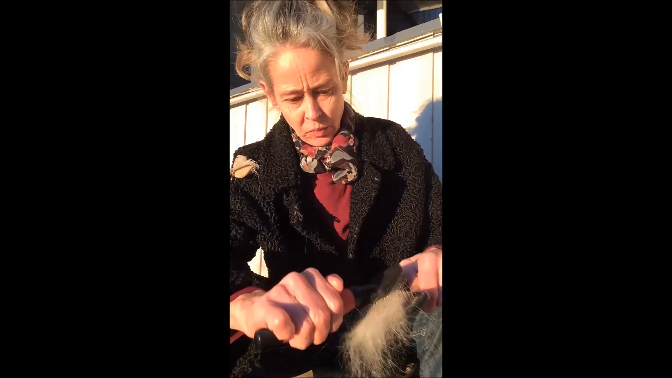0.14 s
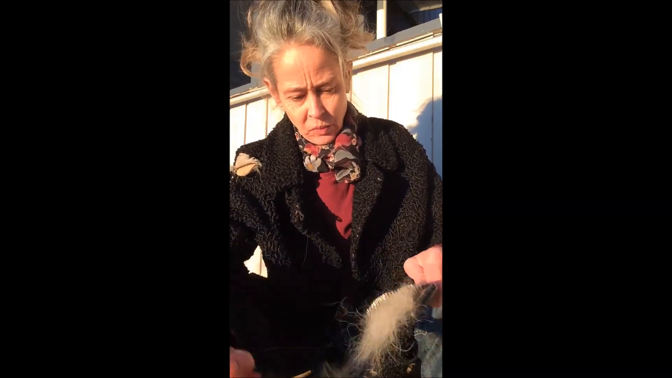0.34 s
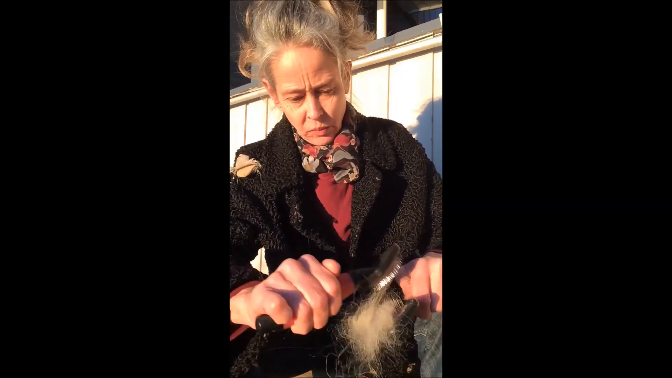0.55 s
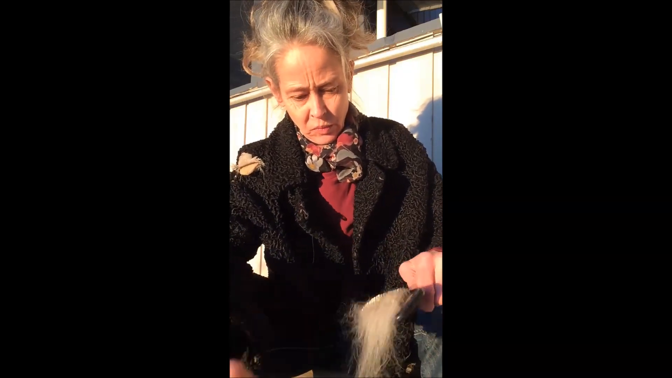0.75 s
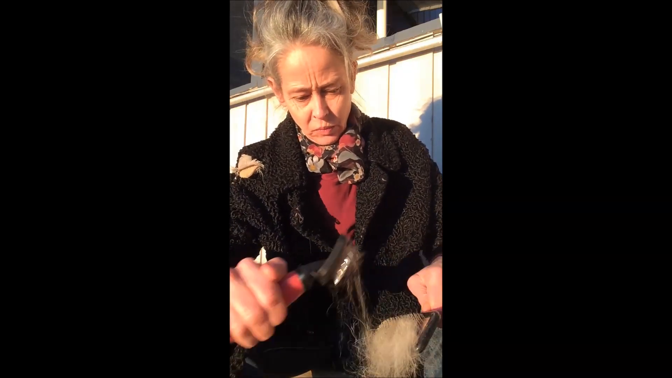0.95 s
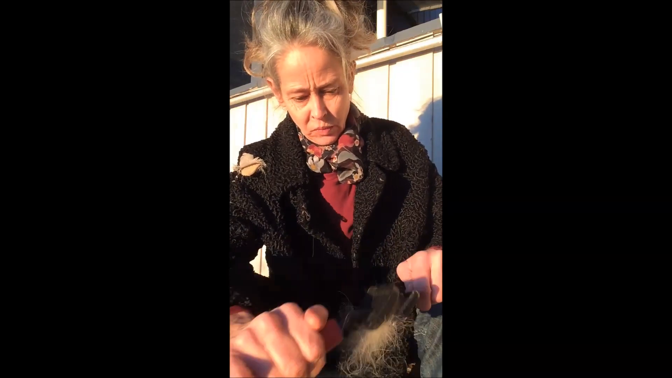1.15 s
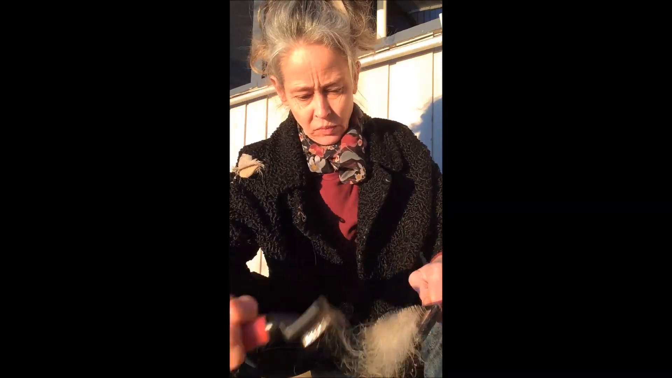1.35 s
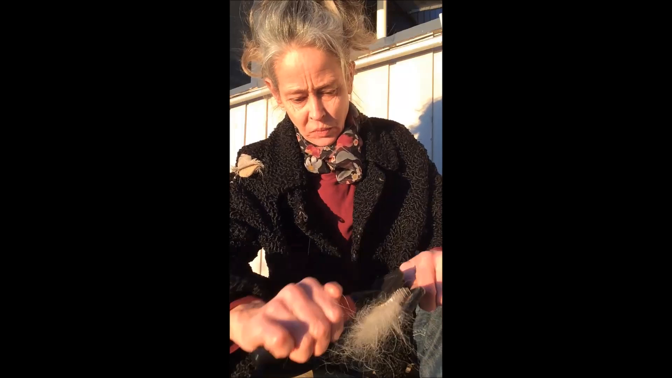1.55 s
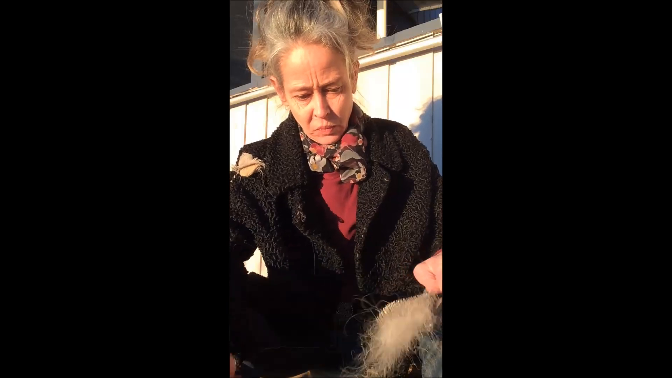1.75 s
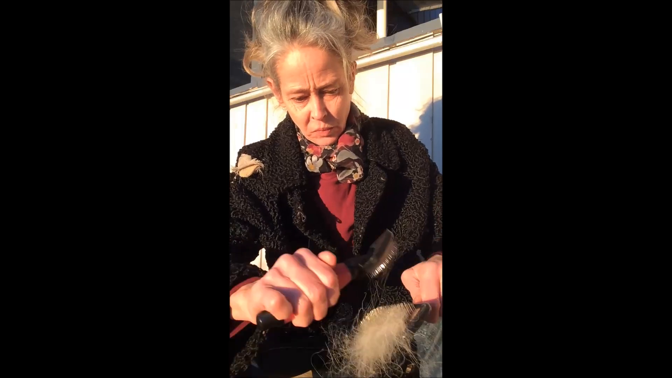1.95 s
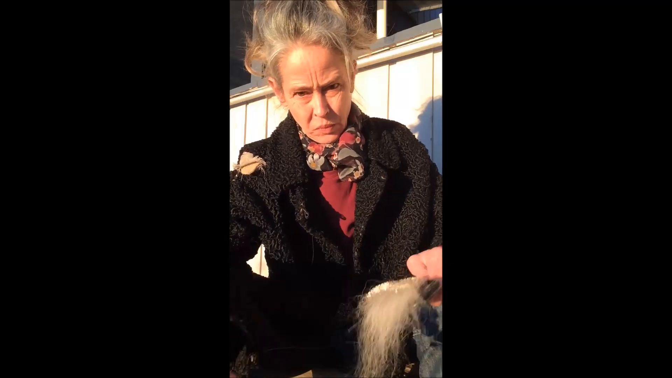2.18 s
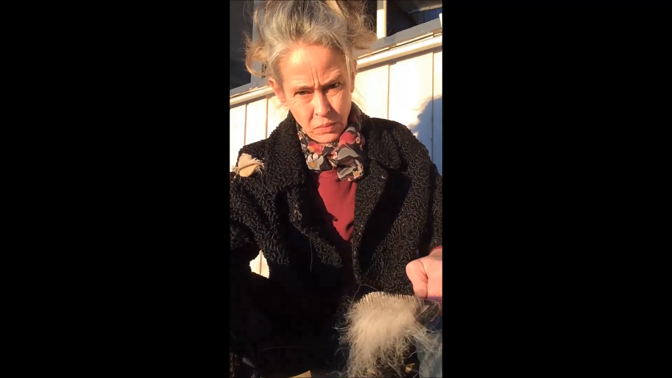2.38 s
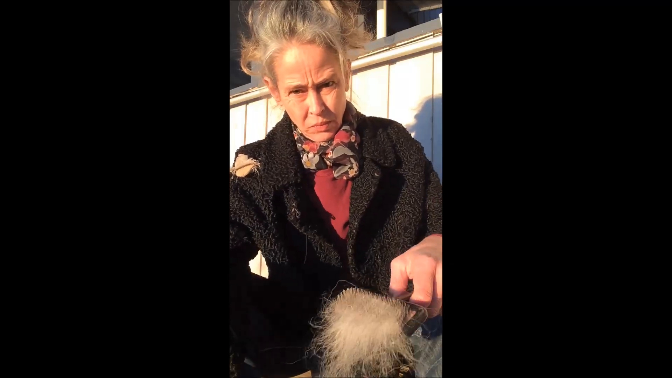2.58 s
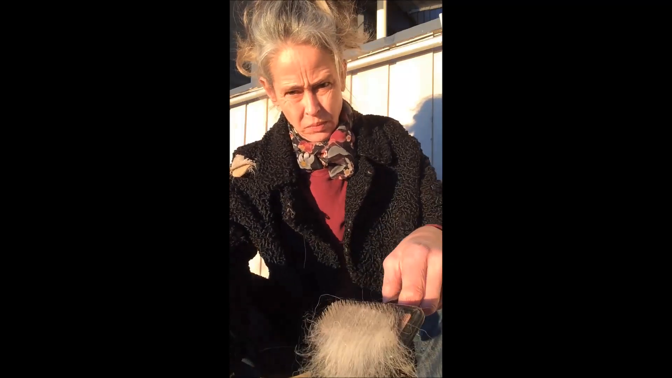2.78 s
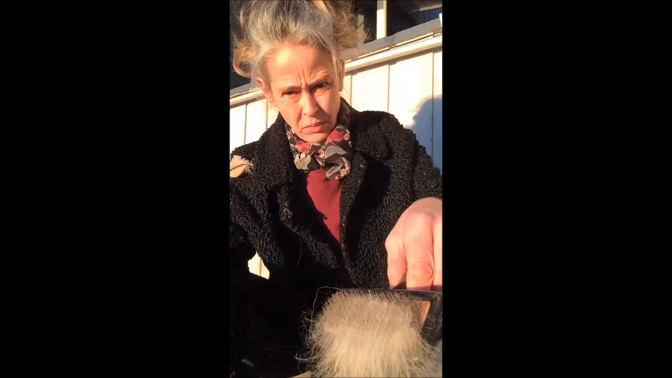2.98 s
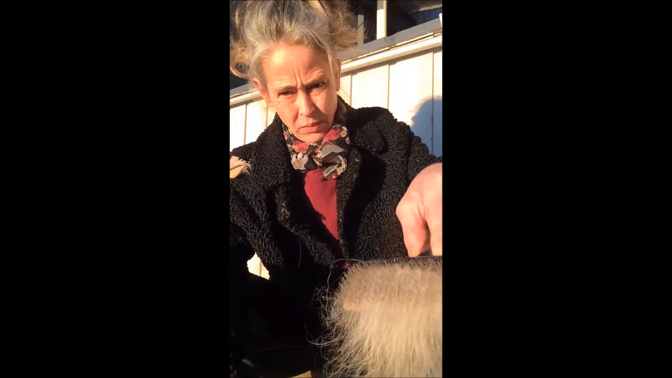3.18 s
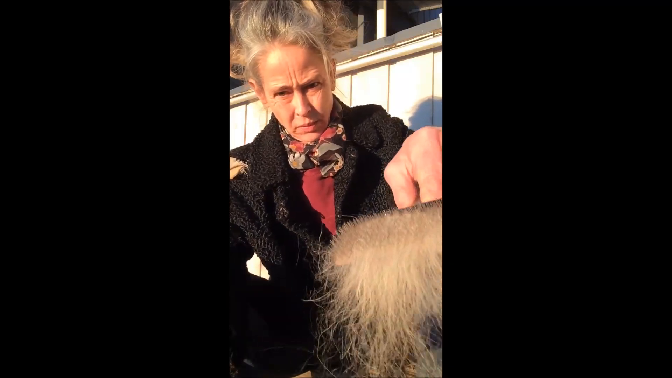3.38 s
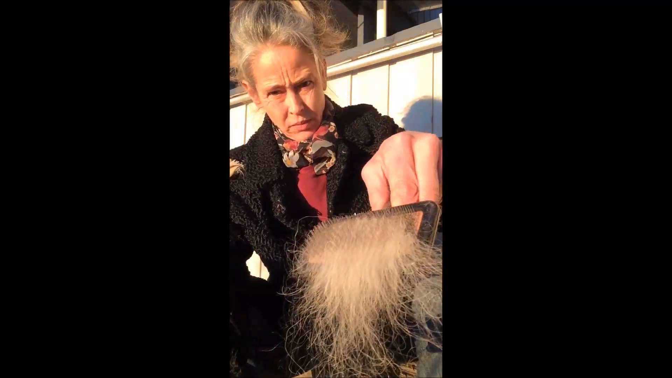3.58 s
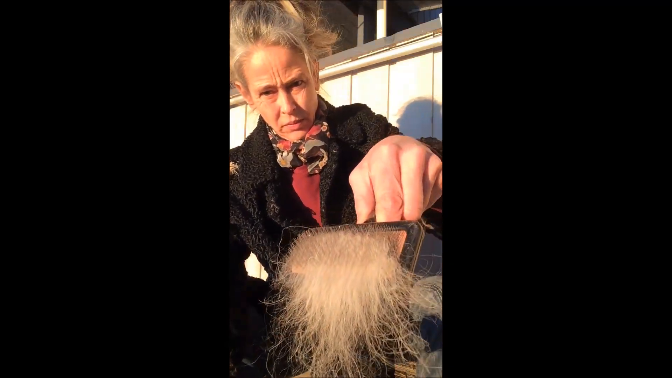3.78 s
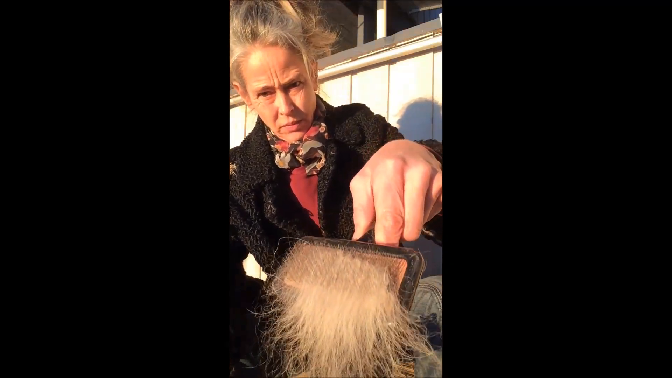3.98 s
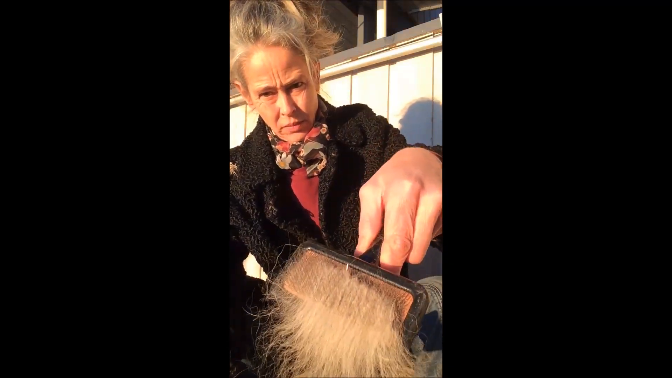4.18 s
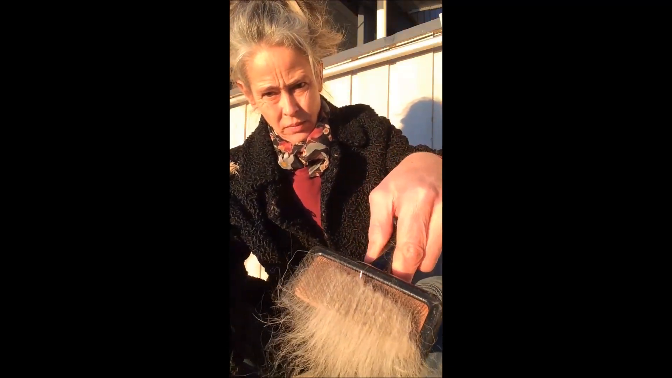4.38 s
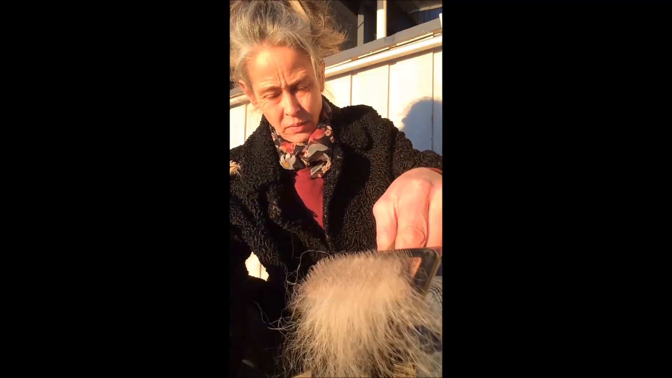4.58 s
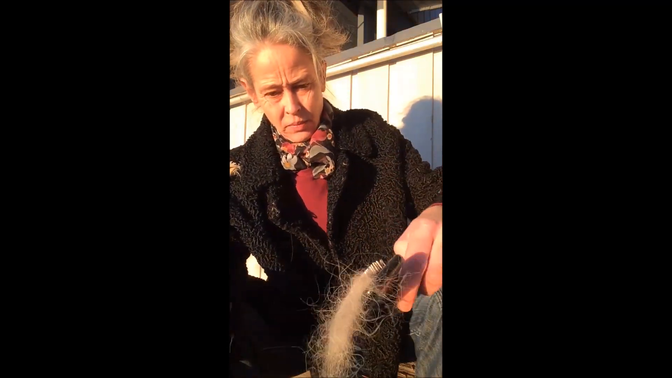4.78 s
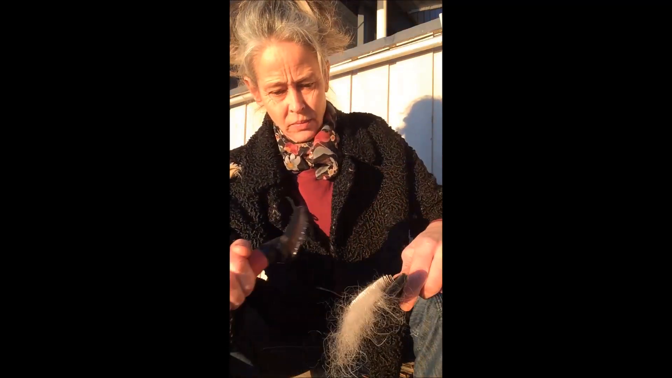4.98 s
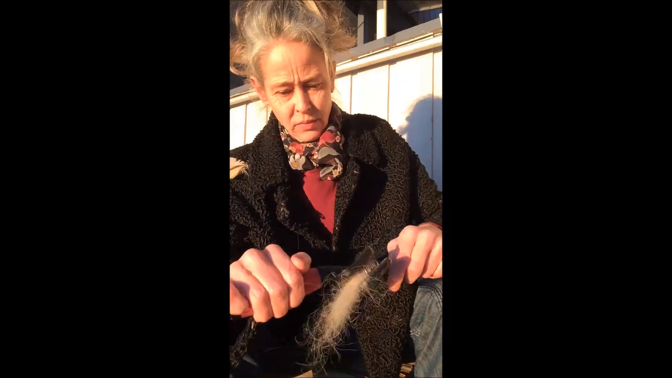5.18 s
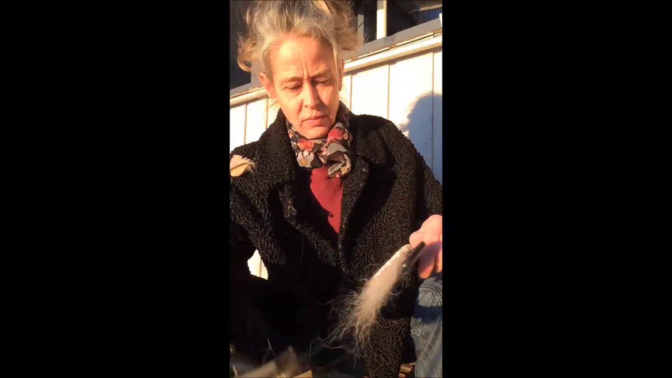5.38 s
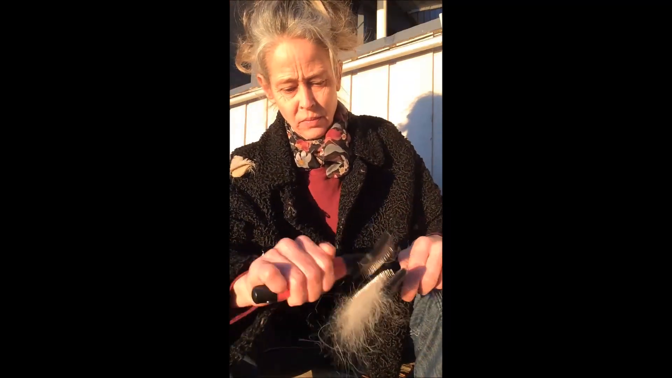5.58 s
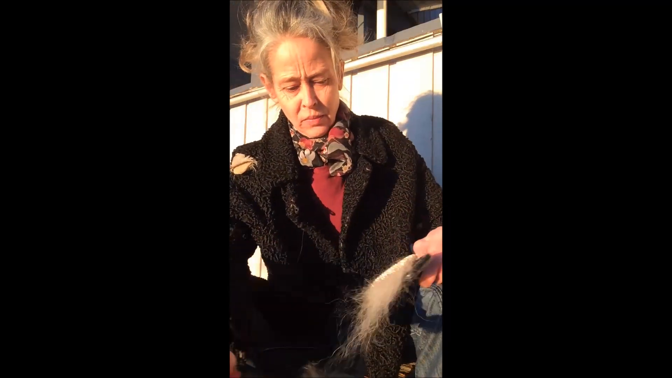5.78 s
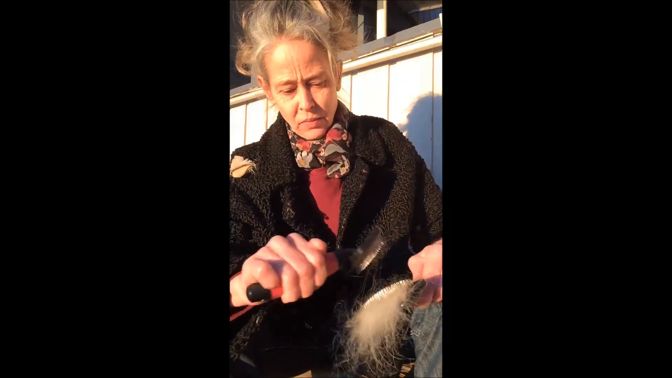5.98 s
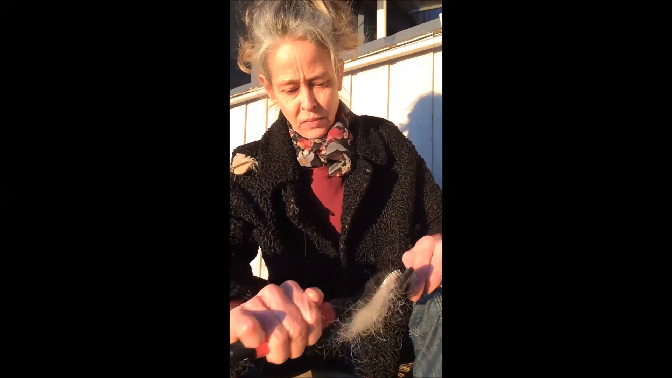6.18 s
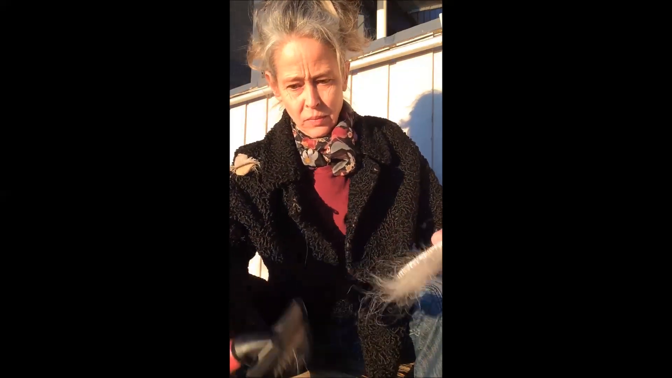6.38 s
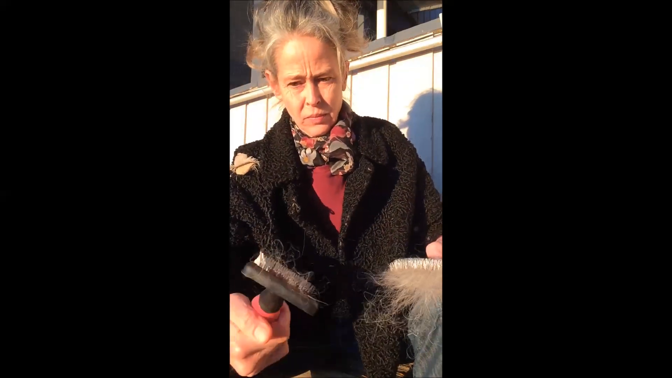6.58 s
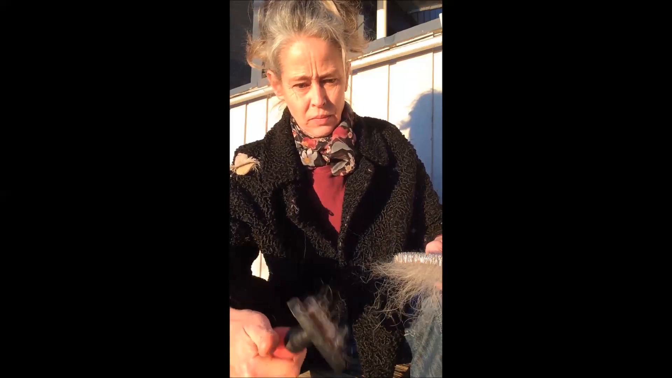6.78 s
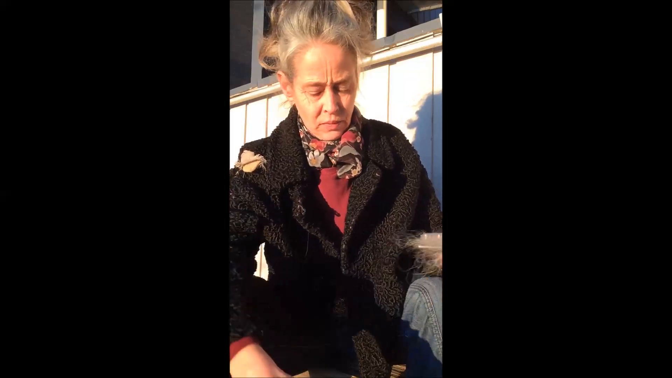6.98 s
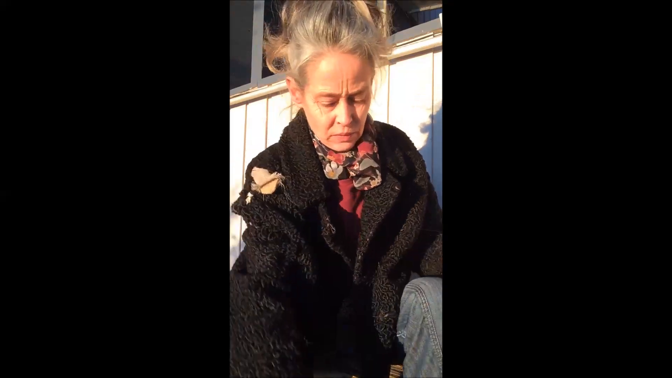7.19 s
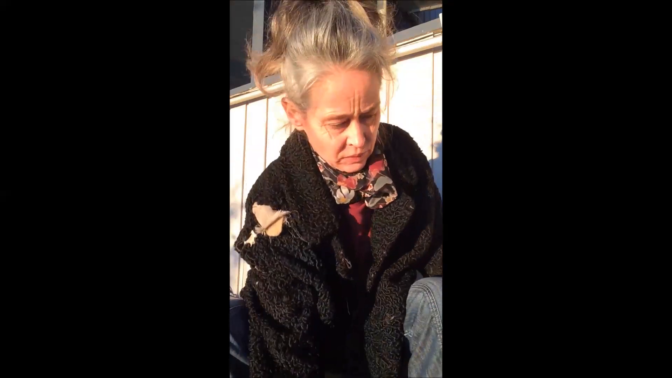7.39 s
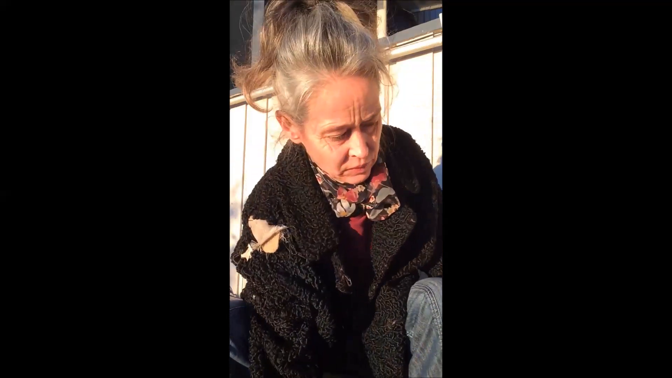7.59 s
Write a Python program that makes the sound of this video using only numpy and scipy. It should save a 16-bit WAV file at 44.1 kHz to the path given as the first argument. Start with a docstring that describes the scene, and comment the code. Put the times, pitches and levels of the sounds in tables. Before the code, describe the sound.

Two wire pet brushes scrape through a clump of hair outdoors: five quick raspy strokes, a pause, then three more, with soft rustling after.

```python
"""Two wire pet brushes card a clump of hair, close to a microphone outdoors: five strokes, a pause, three more.
Each stroke starts with a knock of ringing plastic heads and rasps as hairs stick and slip on the pins.
It ends in a spray of wire clicks as the last wires spring free; single snaps are pins that catch and let go.
Sleeves and loose hair rustle in bunched tiny catches. The yard adds early echoes and a faint tail.
Behind it are far traffic made of coloured noise, a low wavering hum and a passing drone."""
import sys
import numpy as np
from scipy import signal
from scipy.fft import rfft, irfft
from scipy.io import wavfile
from scipy.ndimage import uniform_filter1d

SR = 44100
rng = np.random.default_rng(int(sys.argv[2]) if len(sys.argv) > 2 else 0)


def generate_wav(sig):
    """Save sig (samples, or channels by samples) to the path in sys.argv[1] as 16-bit PCM at SR."""
    pcm = np.round(np.clip(np.atleast_2d(sig).T, -1, 1) * 32767).astype(np.int16)
    wavfile.write(sys.argv[1], SR, pcm)


N = 337365
TIME = np.arange(N) / SR

# The strokes of the brush; a light graze leads into the last one. The dB of touch, drag and spray set the force,
# before the gains of the rasp and the wires.
# Each row: pads touch in s, swell to full drag in s, length until the pads part in s, closing spray in s,
# time to fade by 60 dB in s, wires skating at the touch in dB, drag through the hair in dB, spray of wires in dB,
# lift of the low body in dB, lift of the top fizz at the end of the stroke in dB.
STROKES = [(.332, 0.048, 0.11, .032, 0.06, -44.5, -29.5, -27, 0.5, 0.5),
           (0.756, 0.053, 0.11, .018, 0.08, -37.5, -27, -43, -1.5, -2),
           (1.256, .036, .097, .014, 0.043, -39, -29, -33.5, 0, -0.5),
           (1.696, 0.041, 0.099, 0.04, 0.04, -38, -27.5, -26.5, -2, -0.5),
           (2.163, 0.048, 0.14, 0.031, 0.0228, -36.5, -29, -29, -2, -1),
           (5.352, 0.075, 0.1, 0.028, 0.0567, -70.5, -32, -27.5, -2.5, -2),
           (5.781, .04, .091, 0.037, 0.05, -43.5, -28.5, -25, -1, -0.5),
           (6.207, .045, 0.045, .005, 0.07, -49.5, -44.5, -47.5, 6.5, 2),
           (6.266, .07, 0.11, .028, 0.04, -76, -29.5, -21.5, -4.5, 1)]
# The ways the plastic head rings. Each row: pitch in Hz before the grip shifts it, relative level in dB,
# time to fade by 60 dB in s.
HEAD = [(430, -22, 0.016), (718, -2.5, 0.011), (746.7, -1.5, 0.018), (960, -12.5, 0.023),
        (1240, -14.5, 0.029), (1320, -8.5, 0.032), (1650, -10.5, 0.038), (2160, -23, 0.011),
        (2720, -16.5, 0.025)]
# Colour of one wire flick. Each row: frequency in Hz, relative level in dB.
FLICK = [(50, -42.5), (170, -12.5), (330, -8.5), (750, 1), (1500, -3.5), (2600, -5), (5000, 4), (7200, 3.5),
         (9000, 1), (10800, 3), (13000, -2), (15800, 2)]
# Colour of a tuft of hair plucked or crushed. Each row: frequency in Hz, relative level in dB.
PLUCK = [(50, -49), (200, -20.5), (450, -8), (800, 0.5), (1400, 1.5), (2400, -4), (3300, -4.5), (4800, -4),
         (6200, -11), (8500, -22), (16000, -32)]


def gain_of(db):
    """Turns decibels into amplitude."""
    return 10 ** (np.asarray(db) / 20)


def evened(x):
    """Scales a sound to rms 1."""
    return x / np.sqrt(np.mean(x ** 2) + 1e-20)


def unit(x):
    """Scales a sound to energy 1."""
    return x / np.linalg.norm(x)


def read(points, hz):
    """Reads a curve of (Hz, value) between its points, on a log-frequency axis."""
    f, value = np.transpose(points)
    return np.interp(np.log(hz + 1), np.log(f + 1), value)


def level(points):
    """Turns a curve of (s, dB) into a gain for every sample."""
    return gain_of(np.interp(TIME, *np.transpose(points)))


def add(mix, s, sound):
    """Mixes a sound in at s seconds."""
    part = mix[max(round(s * SR), 0):][:len(sound)]
    part += sound[:len(part)]


def through(x, response):
    """Passes x through an impulse response, so that each sample of x sets off a copy of it."""
    return signal.oaconvolve(x, response)[:len(x)]


def click(spectrum, size=4096):
    """Makes a click of a given colour, packed as early as that colour allows (minimum phase), energy 1."""
    hz = abs(np.fft.fftfreq(size, 1 / SR))
    log_gain = np.log(gain_of(read(spectrum, hz)))
    early = np.fft.ifft(np.exp(np.conj(signal.hilbert(log_gain)))).real
    return unit(early[:size // 2])


def noise(spectrum):
    """Makes steady noise of a given colour, rms 1."""
    hz = np.fft.rfftfreq(N, 1 / SR)
    white = rfft(rng.standard_normal(N))
    return evened(irfft(white * gain_of(read(spectrum, hz)), N))


def wander(rate):
    """Drifts slowly by chance, rms 1, up to about rate changes a second."""
    hz = np.fft.rfftfreq(N, 1 / SR)
    white = rfft(rng.standard_normal(N))
    return evened(irfft(white / (1 + (hz / rate) ** 4), N))


def surge(peak_s, rise_s, fall_s):
    """Makes a rounded swell that peaks at gain 1."""
    edge_db = -11.5  # reached one rise before the peak and one fall after it
    away = (TIME - peak_s) / np.where(TIME < peak_s, rise_s, fall_s)
    return gain_of(edge_db * np.minimum(away ** 2, 20))


def catches(per_s, spread_db, clump_db, clump_rate, size=700):
    """Tiny releases of uneven size, bunched as rows of pins let go; the hand keeps their mean power steady."""
    uneven_db = spread_db * np.minimum(rng.exponential(1, N), 4)
    strength = gain_of(uneven_db + clump_db * wander(clump_rate))
    train = strength * rng.choice([-1, 1], N) * (rng.random(N) < per_s / SR)
    mean_power = abs(uniform_filter1d(train ** 2, size))  # over a window of size samples
    return train / np.sqrt(mean_power + 1e-3)


def ring(modes, grip=1, size=4096):
    """One blow on plastic; the grip shifts its modes a little. A small body radiates little below its modes."""
    t = np.arange(size) / SR
    motion = sum(gain_of(db - 60 * t / t60) * np.sin(2 * np.pi * hz * grip * t) for hz, db, t60 in modes)
    low_cut = signal.butter(3, .75 * modes[0][0], "high", fs=SR, output="sos")
    return unit(signal.sosfilt(low_cut, motion))


def cluster(colour, t60, lead_db=-12, size=1024):
    """One pin lets go with a sharp click and its neighbours follow within a few milliseconds."""
    t = np.arange(size) / SR
    followers = unit(rng.standard_normal(size) * gain_of(-60 * t / t60) * (t > 0))
    releases = gain_of(lead_db) * (t == 0) + followers
    return unit(through(releases, colour))


def strokes():
    """Each stroke skates, sinks in, drags, sprays and parts. Returns the force on the hair and on the wires."""
    swell_db, sag_db_per_s = 24.5, 44.5  # the drag builds as the pins sink in, and sags as the hair thins out
    touch_s, skate_s, skate_fade_s = .004, 0.026, .07  # tips land, skate over each other, are muffled by hair
    muffled_db = -13.5  # wires buried in hair, relative to the drag
    spray_rise_s, spray_relief_db = 0.0074, -1  # bare wires meet at the pad's edge and take load off the hair
    hair, wires, t = np.zeros(N), np.zeros(N), np.arange(SR // 2) / SR
    for s, swell_s, length_s, spray_s, fade_s, skate_db, drag_db, spray_db, _, _ in STROKES:
        parting = gain_of(-60 * np.maximum(t - length_s, 0) / fade_s)
        contact = np.minimum(t / touch_s, 1) * parting
        yet_to_swell_db = swell_db * np.maximum(1 - t / swell_s, 0)
        sagged_db = sag_db_per_s * np.maximum(t - swell_s, 0)
        pull = gain_of(drag_db - yet_to_swell_db - sagged_db)
        skate = gain_of(skate_db - 60 * np.maximum(t - skate_s, 0) / skate_fade_s)
        bare = gain_of(-60 * np.maximum(length_s - spray_s - t, 0) / spray_rise_s)
        muffled = gain_of(muffled_db) * pull
        spray = gain_of(spray_db) * bare
        add(hair, s, contact * pull * gain_of(spray_relief_db * bare))
        add(wires, s, contact * np.sqrt(skate ** 2 + muffled ** 2 + spray ** 2))
    return hair, wires


def drag(force):
    """Hairs stick and slip on the pins: a dense rasp, part of which rings the head."""
    # Colour of one slip of a hair. Each row: frequency in Hz, relative level in dB.
    slip_colour = [(50, -51), (170, -27.5), (300, -13), (430, -5.5), (540, -12), (720, 1.5), (1000, -5.5),
                   (1400, -2.5), (2600, -10.5), (4500, -6), (6000, -12), (8000, -25), (16000, -36.5)]
    slips = catches(per_s=6000, spread_db=3.0, clump_db=1.0, clump_rate=330, size=500)
    rasp = through(force * slips, click(slip_colour))
    blows = catches(per_s=2400, spread_db=6.5, clump_db=0.6, clump_rate=220)
    hollow = through(force * blows, ring(HEAD))
    return gain_of(-2.0) * rasp + gain_of(-15) * hollow


def wire_flick(ring_db, t60, count=14, size=1024):
    """A click of wire on wire and the brief ring of the few pins that it touches."""
    t = np.arange(size) / SR
    hz, phase = rng.uniform(3500, 16000, (count, 1)), rng.random((count, 1))
    tones = np.sin(2 * np.pi * (hz * t + phase)).sum(0)
    pin_ring = unit(tones * gain_of(-60 * t / t60))
    hit = np.pad(click(FLICK), (0, size))
    return unit(through(hit, (t == 0) + gain_of(ring_db) * pin_ring))


def pins(force, count=12):
    """Wires flick past each other, in several patches of the pad that each have their own ring."""
    train = force * catches(per_s=6000, spread_db=1.5, clump_db=2.5, clump_rate=76, size=400)
    patch = rng.integers(0, count, N)
    flicks = sum(through(train * (patch == k), wire_flick(ring_db=-9, t60=0.016)) for k in range(count))
    return gain_of(-0.5) * flicks


def pressed(x, body_hz, fizz_hz):
    """Firm strokes drive the whole cushion; light ones only graze the tips of the pins."""
    fizz_db_per_s = 33.5  # the top fizz dulls as a stroke goes on
    body_db, fizz_db = np.zeros((2, N))
    for s, _, length_s, *_, low_db, top_db in STROKES:
        now = TIME >= s  # holds until the next stroke
        time_left = np.maximum(s + length_s - TIME[now], 0)
        body_db[now] = low_db
        fizz_db[now] = top_db + fizz_db_per_s * time_left
    body = signal.sosfiltfilt(signal.butter(2, body_hz, fs=SR, output="sos"), x)
    fizz = signal.sosfiltfilt(signal.butter(2, fizz_hz, "high", fs=SR, output="sos"), x)
    return x + (gain_of(body_db) - 1) * body + (gain_of(fizz_db) - 1) * fizz


def snaps():
    """Rows of pins catch in the hair and let go; levels are rms over 5 ms."""
    # Each row: start in s, snap of the wires in dB before a trim of -1.5 dB,
    # pluck of the hair in dB before a trim of -7 dB.
    releases = [(.3165, -40, -51), (.408, -36, -40), (.4351, -22, -38), (0.4737, -45, -31.5),
                (1.309, -35.5, -30), (1.345, -20.5, -38), (1.79, -23.5, -29), (2.228, -35.5, -39),
                (2.249, -27.5, -37.5), (2.2937, -23, -37.5), (2.338, -52, -53), (2.604, -64.5, -62.5),
                (4.079, -78.5, -60), (5.01, -58.5, -53.5), (5.3625, -64, -47), (5.378, -57, -44),
                (5.396, -54, -39), (5.408, -36, -38), (5.418, -35, -40), (5.443, -24, -43),
                (5.897, -49.5, -56), (6.238, -56, -38.5), (6.274, -61.5, -41), (6.286, -54, -35),
                (6.3435, -29.5, -46), (6.3553, -28.5, -37), (6.3767, -20, -23.5)]
    out = np.zeros(N)
    for s, wire_db, hair_db in releases:
        add(out, s, gain_of(wire_db - 1.5) * cluster(click(FLICK), t60=.011, lead_db=-6.5))
        add(out, s, gain_of(hair_db - 7) * cluster(click(PLUCK), t60=0.0047, lead_db=-7))
    return np.sqrt(.005 * SR) * out  # from energy 1 to rms over 5 ms


def pad(x):
    """The pad and its pins colour the sound in narrow resonances."""
    # Each row: frequency in Hz, width in Hz, lift in dB (below 0 is a dip).
    resonances = [(495, 35, -1), (640, 30, 5), (697, 34, 4.5), (1250, 54, 1.5), (1336, 47, 4.5),
                  (1540, 66, 0.5), (2003, 51, 3.5), (3098, 60, 3.5), (3800, 26, 5.5), (3990, 40, -0.5),
                  (4780, 80, 2), (5210, 120, -0.5), (6080, 72, -3), (6740, 140, 3.5)]
    out = x
    for hz, width, db in resonances:
        band = signal.lfilter(*signal.iirpeak(hz, hz / width, SR), x)
        out = out + (gain_of(db) - 1) * band
    return out


def knocks(contact_s):
    """Head meets head through the hair, edge first, so the push is soft-edged; levels are rms over 5 ms."""
    # Each row: full knock in s, how much earlier the edge touches in s, grip as a factor on the head's pitches,
    # ring of the head in dB, thud of the cushion in dB, crunch of hair in dB, clash of pins in dB.
    meetings = [(0.3212, 0.0048, 1.03, -39, -42, -59.5, -55), (.7458, .002, 0.98, -28, -38, -36.5, -31),
                (1.253, 0.0072, 1.19, -24.5, -26, -32.5, -31), (1.689, 0.0011, 1.08, -23, -40, -33.5, -28),
                (2.161, 0.0029, 1, -28.5, -30.5, -37.5, -39.5),
                (5.3224, .0065, .96, -40, -47.5, -42.5, -59), (5.769, .009, 1.02, -29, -29, -41, -45),
                (6.194, 0.0062, 1.03, -30, -39, -34.5, -40.5)]
    # Colour of a cushion thud. Each row: frequency in Hz, relative level in dB.
    thud_colour = [(20, -47), (50, -16.5), (110, -2.5), (250, 6), (420, 6.5), (700, -19.5), (2000, -36.5),
                   (8000, -72.5)]
    # The ways the handle rings. Each row: pitch in Hz, relative level in dB, time to fade by 60 dB in s.
    handle_modes = [(218, -12, 0.023), (281, 5, .04), (340, 3, 0.061), (960, -7, 0.037)]
    edge_db = -11.5  # the edge's touch, relative to the full knock
    bump_s, bump_db = 3.947, -46.5  # the grip shifts and bumps the handle
    out, t = np.zeros(N), np.arange(256) / SR
    push = t * np.exp(-t / contact_s)
    for s, lead_s, grip, ring_db, thud_db, crunch_db, clash_db in meetings:
        for at, force in (s - lead_s, gain_of(edge_db)), (s, 1):
            add(out, at, force * gain_of(ring_db) * unit(through(ring(HEAD, grip), push)))
            add(out, at, force * gain_of(crunch_db) * cluster(click(PLUCK), t60=.018))
            add(out, at, force * gain_of(clash_db) * cluster(click(FLICK), t60=.022))
        add(out, s, gain_of(thud_db) * click(thud_colour))
    add(out, bump_s, gain_of(bump_db) * ring(handle_modes))
    return np.sqrt(.005 * SR) * out  # from energy 1 to rms over 5 ms


def yard(x, size=16384):
    """The body and the boarded wall throw back early echoes; the yard adds a faint, short tail."""
    # Each row: frequency in Hz, time for the tail to fade by 60 dB in s.
    tail_t60 = [(200, .2), (1500, 0.25), (5000, 0.21), (10000, 0.16), (16000, 0.095)]
    hz, t, z = signal.stft(rng.standard_normal(size), SR, nperseg=256)
    fade = gain_of(-60 * t / read(tail_t60, hz)[:, None])
    tail = signal.istft(z * fade, SR, nperseg=256)[1]
    t = np.arange(len(tail)) / SR
    tail = unit(tail * (1 - np.exp(-t / 0.014)))  # the tail builds up gently
    sparse = rng.standard_normal(len(t)) * (rng.random(len(t)) < .02) * (t > .002)
    early = unit(sparse * gain_of(-60 * t / 0.038))
    return x + through(x, gain_of(-27.5) * tail + gain_of(-13.5) * early)


def rustle():
    """Fibres of the coat and of the loose hair catch in uneven surges as the arms move."""
    # Colours of wool and of loose hair. Each row: frequency in Hz, relative level in dB.
    wool_colour = [(200, -9), (500, 3), (850, 7), (1300, 0.5), (2000, 1), (4500, -6.5), (8000, -14),
                   (16000, -26.5)]
    hair_colour = [(200, -20), (2000, -6.5), (4500, -0.5), (8000, -0.5), (12000, -11), (16000, -6)]
    # Surges of soft noise; the levels wander a little around these values. The first is a faint hiss already
    # fading # as the sound begins; the others are rustles that come as the arms move. # Each row: peak in s,
    # rise in s, fall in s, wool rubbing in dB, loose hair swishing in dB.
    rustles = [(0, .05, 0.05, -66.5, -63.5), (1.05, 0.029, 0.068, -65, -78),
               (2.65, 0.35, 0.54, -80.5, -76), (4.101, 0.19, .6, -77.5, -91.5),
               (6.65, 0.081, 0.15, -74, -72), (7.0, 0.14, 0.2, -75.5, -75.5),
               (7.21, 0.098, 0.18, -64.5, -73), (7.47, 0.22, 0.22, -65, -68.5)]
    stir_db = -85.5  # the coat is never quite still
    wool = through(catches(per_s=4300, spread_db=1, clump_db=4, clump_rate=40), click(wool_colour))
    hair = through(catches(per_s=6700, spread_db=-2.5, clump_db=3.0, clump_rate=55), click(hair_colour))
    power = np.zeros((2, N))
    for s, rise_s, fall_s, wool_db, hair_db in rustles:
        power += (gain_of([[wool_db], [hair_db]]) * surge(s, rise_s, fall_s)) ** 2
    rub, swish = np.sqrt(power)
    rubbing = wool * (rub + gain_of(stir_db)) * gain_of(1.9 * wander(rate=14))
    swishing = hair * swish * gain_of(1.2 * wander(rate=10))
    return rubbing + swishing


def hum(hz, drift_hz, waver_db):
    """A distant tone that wavers in pitch and strength, rms 1."""
    turns = np.cumsum(hz + drift_hz * wander(rate=6.6)) / SR
    return evened(np.sin(2 * np.pi * turns) * gain_of(waver_db * wander(rate=6)))


def background():
    """Far traffic as coloured noise, with a low hum and a faint drone that comes and goes."""
    # Colour of the traffic. Each row: frequency in Hz, relative level in dB.
    air_colour = [(15, -56.5), (25, -28), (56, -1), (74, -5.5), (97, -2), (120, -2.5), (185, -12.5),
                  (363, -14.5), (545, -16), (936, -15.5), (2110, -27), (3430, -28.5), (4140, -31.5),
                  (14800, -44), (16000, -45.5)]
    # Level of the low hum over time. Each row: time in s, level in dB.
    hum_level = [(0, -63), (3.4, -65.5), (3.8, -71), (5.6, -72), (6.2, -63.5), (7.65, -74.5)]
    air = gain_of(-62) * noise(air_colour) * gain_of(.7 * wander(rate=4))
    low_hum = level(hum_level) * hum(76.4, drift_hz=.7, waver_db=1.3)
    drone = hum(377, drift_hz=16, waver_db=3)
    passing = surge(peak_s=4.65, rise_s=.7, fall_s=0.69)
    return air + low_hum + gain_of(-72.5) * passing * drone


def scene():
    """The brushes in the yard, over the rustling and the background."""
    hair, wires = strokes()
    carding = pressed(drag(hair) + pins(wires), body_hz=840, fizz_hz=10500)
    brushes = pad(carding + snaps()) + knocks(contact_s=0.00013)
    return (yard(brushes) + rustle() + background())[None]


def record(dry):
    """The microphone rolls off the deepest rumble; then the recorder cuts off the top of the treble."""
    edge_hz = 15900
    thin = signal.sosfilt(signal.butter(2, 32, "high", fs=SR, output="sos"), dry)
    band_limit = signal.firwin(511, edge_hz, window=("kaiser", 8), fs=SR)
    return signal.oaconvolve(thin, band_limit[None], "same")


dry = scene()
out = record(dry)
generate_wav(out)
```